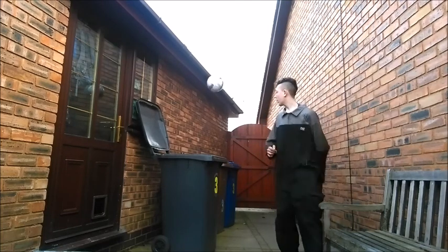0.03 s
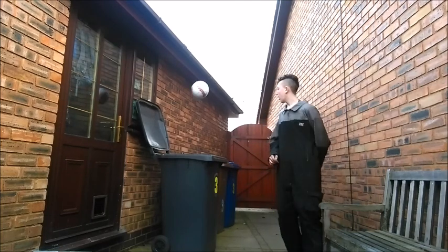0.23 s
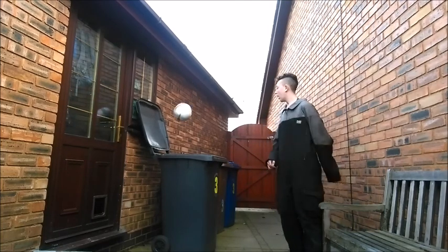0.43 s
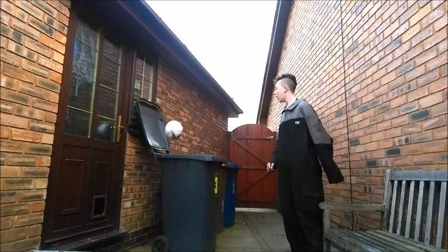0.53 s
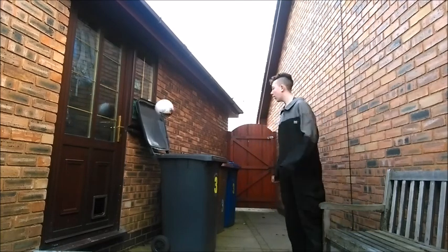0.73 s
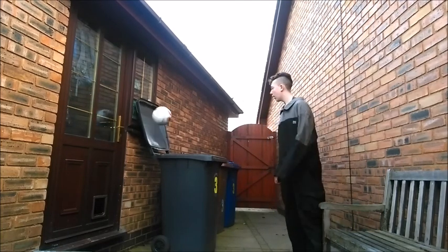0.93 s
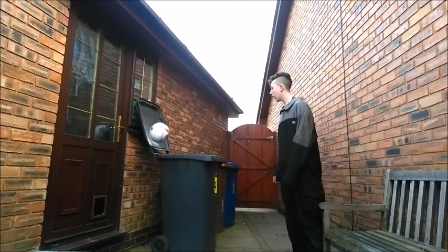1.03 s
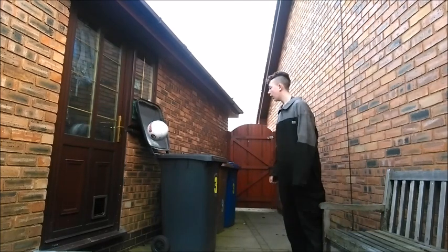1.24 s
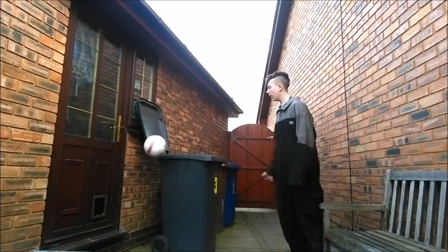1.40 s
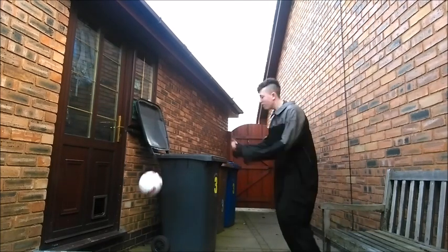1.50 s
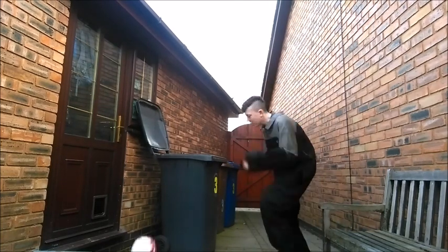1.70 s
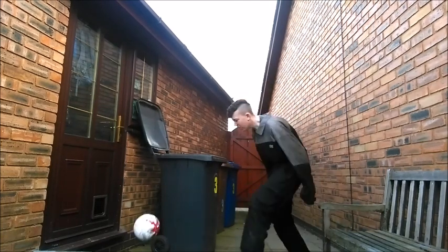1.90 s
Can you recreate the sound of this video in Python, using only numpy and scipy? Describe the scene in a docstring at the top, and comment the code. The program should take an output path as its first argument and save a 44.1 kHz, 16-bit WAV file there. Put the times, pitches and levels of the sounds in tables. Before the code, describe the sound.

A football clatters twice against a plastic wheelie bin, then drops and bounces on paving.

```python
"""Far traffic rumbles and hums around a narrow brick yard. A football clatters against a plastic
wheelie bin and its open lid: the panels ring and the hollow booms. Puffs of wind thump the
microphones, the right one hardest, and make the limiter duck, while shoes and clothes scuff.
The ball clatters on the bin a second time, drops off with a sharp slap and bounces on the
paving, where the air inside it resonates and the walls return the sound."""
import sys
import numpy as np
from scipy import signal
from scipy.fft import rfft, irfft
from scipy.io import wavfile
from scipy.ndimage import uniform_filter1d, minimum_filter1d

SR = 44100
rng = np.random.default_rng(int(sys.argv[2]) if len(sys.argv) > 2 else 0)


def bounce(signal):
    """Save signal as a 16-bit WAV file at the path given by the first command-line argument."""
    frames = np.transpose(np.atleast_2d(signal))
    limited = np.clip(frames, -1, 1)
    pcm = np.round(limited * 32767).astype(np.int16)
    wavfile.write(sys.argv[1], SR, pcm)


N = 85995
T = np.arange(N) / SR

# Spectrum of far traffic: frequency_hz, gain_db
TRAFFIC_SPECTRUM = [(20, -46), (45, -30.5), (85, -31.5), (200, -45), (350, -38), (600, -54), (1400, -58.5),
                    (3000, -61.5), (6000, -66.5), (15000, -68.5)]
# Tones of the town's hum: pitch_hz, level_db
HUM_TONES = [(156, -62.5), (323, -57.5), (414, -68)]

# Puffs of wind: start_s, length_s, level_db, corner_hz, left_minus_right_db
WIND_PUFFS = [(.008, 0.031, -39, 88, 9), (0.4, .025, -22.5, 235, -26), (0.433, 0.049, -25.5, 99, -21),
              (.485, .04, -36, 88, -13), (.571, .023, -8.5, 192, -47), (0.592, 0.0383, -16, 161, -34),
              (0.633, 0.057, -23, 107, -26), (0.675, 0.14, -35, 97, -15.5), (1.12, 0.087, -43, 85, 21),
              (1.38, 0.037, -40, 76, 13), (1.438, 0.032, -40, 77, 9)]
# Pops of the diaphragm within the puffs: start_s, level_db, pitch_hz, tick_db
DIAPHRAGM_POPS = [(0.4129, -15, 327, 4.5), (0.417, -9, 198, -4), (.4215, -27, 725, 3),
                  (0.5691, -21, 252, -5.5), (0.5767, 0, 113, 12.5), (0.5864, 0.5, 92.3, 8.5),
                  (0.5924, -12.5, 302, 5), (0.6031, -6, 126, 5), (0.6104, -22, 160, 4),
                  (0.6239, -6.5, 330, 8)]
# Spectrum of each pop's tick: frequency_hz, gain_db
TICK_SPECTRUM = [(100, -18), (400, 1.5), (800, 4.5), (1300, -6), (2200, -13.5), (3300, -24), (4500, -42),
                 (8000, -63)]

# Blows on the bin and rattles of its lid: start_s, level_db, boom_db, treble_db
BIN_BLOWS = [(0.2132, 0.5, 2.5, 5), (0.2238, 1, -5, -5), (.2445, -1.5, 4, -3), (.2835, 3.5, 6, 0),
             (0.2884, -2.5, -5, -2), (0.326, -19, -0.5, -10), (0.341, -8.5, -16, 0),
             (0.375, -12.5, -7, -12), (.8003, -5, -6.5, 6), (.823, -3, 2.5, 10.5), (.837, 1, 4, 5),
             (.852, -8, -5, 5), (0.887, -15, 2, 4.5), (1.530, -29, -12, 0)]
# Spectra of the plastic and of the hollow: frequency_hz, gain_db
CLATTER_SPECTRUM = [(100, -31.5), (300, -23), (500, -21), (660, -21), (1100, -18.5), (1750, -23.5),
                    (2200, -25.5), (2750, -22.5), (3600, -28.5), (4150, -28), (4500, -28.5), (5100, -31),
                    (11000, -36), (16000, -41)]
BOOM_SPECTRUM = [(25, -21.5), (50, -15.5), (90, -10), (140, -18), (220, -16), (350, -20.5), (600, -41),
                 (2000, -85)]
# Ring time of the bin between the walls: frequency_hz, t60_s
BIN_DECAY = [(60, 0.58), (120, 0.69), (300, 0.77), (600, 0.29), (1200, 0.3), (3000, 0.27), (6000, 0.16),
             (12000, 0.11)]
# Modes of the bin and lid: pitch_hz, level_db, t60_s
PANEL_MODES = [(103, -36.5, 0.53), (169, -49, 0.45), (209.3, -39, 0.26), (226, -57, 0.32), (334, -47, 0.66),
               (636, -41.5, 0.21), (780, -52, .28), (998, -41.5, 0.33), (1050, -58, 0.26),
               (1220, -50, 0.25), (2182, -43.5, .25), (2430, -50, 0.3), (2680, -42, 0.16),
               (2930, -50, 0.13), (4480, -41.5, 0.18)]

# Scuffs of shoes and clothes: start_s, grit_db, rise_s, t60_s, body_db
SCUFF_STROKES = [(.532, -19.5, 0.0076, 0.19, -25), (.736, -18.5, 0.00079, 0.072, -30),
                 (1.6117, 3.5, 0.0012, .055, -0.5), (1.855, -19.5, 0.0088, 0.37, -10.5)]
# Spectra of a scuff's grit and soft body: frequency_hz, gain_db
GRIT_SPECTRUM = [(300, -38), (1500, -16.5), (3500, -16.5), (6500, -9), (9000, -11), (15000, -14.5)]
BODY_SPECTRUM = [(60, -24), (170, -0.5), (350, 0), (700, -10), (2000, -16.5), (6000, -29.5)]
# Envelope of the clothing's rustle: time_s, level_db
RUSTLE_ENVELOPE = [(0, -60), (1.1, -80), (1.27, -55.5), (1.42, -59), (1.6, -53.5), (1.95, -73.5)]
# Spectrum of the rustle: frequency_hz, gain_db
RUSTLE_SPECTRUM = [(300, 3), (3000, 3.5), (7000, -4), (15000, -5.5)]

# Spectra of the ball's two impacts and of their reverberation: frequency_hz, gain_db
SLAP_SPECTRUM = [(100, -9), (500, -10), (1100, 7.5), (1800, 2), (3000, 0), (6000, 0.5), (12000, -1),
                 (16000, -11.5)]
SLAP_TAIL_SPECTRUM = [(40, -25), (95, -10), (200, -23), (450, -31), (1200, -23.5), (2500, -30),
                      (6000, -31.5), (14000, -31.5)]
BOUNCE_SPECTRUM = [(60, -15), (250, 10.5), (500, 15), (900, 10), (1400, 10.5), (2200, 5.5), (3200, -8.5),
                   (5000, -18.5), (14000, -33)]
BOUNCE_TAIL_SPECTRUM = [(60, -25), (250, -21), (750, -16), (1400, -23.5), (2100, -26), (3300, -36),
                        (6000, -45), (14000, -53)]
# Early echoes and later returns from the walls: delay_s, gain_db
SLAP_EARLY = [(.0006, -8.5), (.0029, -10), (.0066, -23)]
SLAP_RETURNS = [(.028, -10.5), (0.044, -12)]
BOUNCE_EARLY = [(.0038, -4), (.0063, -9.5), (0.0103, -13.5)]
BOUNCE_RETURNS = [(.034, -13), (.048, -27)]
# Reverberation time of the yard: frequency_hz, t60_s
YARD_DECAY = [(100, 0.37), (500, .24), (2000, 0.23), (6000, 0.2), (14000, 0.11)]
# Modes of the air in the ball: pitch_hz, level_db, t60_s
BALL_AIR_MODES = [(255, -28, 0.15), (530, -32, 0.024), (786, -34, 0.21), (1040, -51, .15),
                  (1732, -52, 0.11), (1936, -47, 0.12)]

# Shading of nearby sound at the left microphone: frequency_hz, gain_db
LEFT_SHADOW = [(60, 2), (300, -1.5), (700, -1.5), (1400, -1.5), (2800, -8.5), (5600, -9.5), (14000, -15)]


def amp(db):
    """Amplitude grows tenfold for every 20 dB."""
    return 10 ** (np.asarray(db) / 20)


def value_at(curve, hz):
    """Interpolation of a curve on a logarithmic frequency axis."""
    frequencies, values = np.array(curve).T
    return np.interp(np.log(hz), np.log(frequencies), values)


def colour(x, spectrum, size=8192):
    """Minimum-phase filtering: folding the cepstrum gives a causal response with this spectrum."""
    hz = np.maximum(np.fft.rfftfreq(size, 1 / SR), 1)
    cepstrum = irfft(np.log(amp(value_at(spectrum, hz))))
    cepstrum[1:size // 2] *= 2
    cepstrum[size // 2 + 1:] = 0
    response = irfft(np.exp(rfft(cepstrum)))[None, :size // 2]
    return signal.oaconvolve(x, response, axes=-1)[:, :N]


def butterworth(x, hz, kind="low", order=2):
    """A maximally flat filter falls 6 dB per octave per order beyond its corner."""
    return signal.sosfilt(signal.butter(order, hz, kind, fs=SR, output="sos"), x + 1e-18)


def diffuse_noise(corner_hz=770):
    """A diffuse field is alike at two microphones only at long wavelengths."""
    right, independent = rng.standard_normal((2, N))
    treble = butterworth(independent, corner_hz, "high", order=1)
    bass = irfft(rfft(right) / np.hypot(1, np.fft.rfftfreq(N, 1 / SR) / corner_hz), N)
    return np.array([bass + treble, right])


def envelope(start, rise, t60):
    """Exponential decay: after a quick rise, the amplitude falls 60 dB in t60 seconds."""
    out, first = np.zeros(N), int(start * SR)
    age = T[:min(N - first, int(2 * t60 * SR))]
    out[first:first + len(age)] = (1 - np.exp(-age / rise)) * np.exp(-np.log(1000) * age / t60)
    return out


def impulses(events):
    """An ideal impulse excites all frequencies alike; events are start_s, level_db."""
    out = np.zeros((2, N))
    for start, db in events:
        out[:, int(start * SR)] += amp(db)
    return out


def distant_town():
    """Far traffic merges into low noise; random phase modulation makes the hum waver."""
    out = colour(diffuse_noise(), TRAFFIC_SPECTRUM)
    for hz, db in HUM_TONES:
        waver = butterworth(rng.standard_normal(N), 9)
        out += amp(db) * np.sin(2 * np.pi * hz * T + 1.26 * waver / waver.std())
    return out


def wind_eddies():
    """Turbulent pressure rumbles on the microphones, mostly the right one."""
    out = np.zeros((2, N))
    for start, length, db, corner_hz, pan_db in WIND_PUFFS:
        progress = np.clip((T - start) / length, 0, 1)
        swell = np.sqrt(np.maximum(np.sin(np.pi * progress), 0))
        eddy = butterworth(rng.standard_normal(N), corner_hz)
        eddy = butterworth(eddy, 39.5, "high")
        eddy = butterworth(swell * eddy, 3.9 * corner_hz)
        eddy /= np.sqrt(np.sum(eddy ** 2) / (length * SR))  # unit RMS over the puff
        out += amp([[db + min(pan_db, 0)], [db - max(pan_db, 0)]]) * eddy
    return out


def diaphragm_pops(decay_cycles=0.47, left_db=-36):
    """A wind-struck diaphragm is a heavily damped oscillator: it ticks, flutters and pops."""
    ticks = [(start, tick_db) for start, _, _, tick_db in DIAPHRAGM_POPS]
    flutter = sum(amp(db - 19) * envelope(start, rise=0.00028, t60=0.017) for start, db in ticks)
    rasp = flutter * rng.standard_normal(N)
    pops = colour(amp(-4.5) * impulses(ticks) + rasp, TICK_SPECTRUM)[0]
    for start, db, hz, _ in DIAPHRAGM_POPS:
        cycles = np.maximum(T - start, 0) * hz
        swing = np.sin(2 * np.pi * cycles) * np.exp(-cycles / decay_cycles)
        pops += amp(db) * butterworth(swing, 2200, order=4)
    return amp([[left_db], [0]]) * pops


def dense_ringing(hits, spectrum, decay, rise):
    """Overlapping modes act as noise: hits add in power and each octave decays at its own rate."""
    noise_bins = rfft(colour(diffuse_noise(), spectrum))
    octave = np.log2(np.clip(np.fft.rfftfreq(N, 1 / SR), 62.5, 16000) / 62.5)
    out = np.zeros((2, N))
    for k in range(9):
        hz = 62.5 * 2 ** k
        t60, treble_share = value_at(decay, hz), hz / (hz + 3000)
        power = sum((amp(db + treble_db * treble_share) * envelope(start, rise, t60)) ** 2
                    for start, db, treble_db in hits)
        band = irfft(noise_bins * np.maximum(1 - abs(octave - k), 0), N)
        out += np.sqrt(power) * band
    return out


def modal_ringing(modes, start, detune):
    """Free vibration is a sum of damped sinusoids, here slightly detuned at every blow."""
    out, first = np.zeros(N), int(start * SR)
    age = T[:min(N - first, N // 3)]
    for (hz, db, t60), deviation in zip(modes, rng.standard_normal(len(modes))):
        tone = np.sin(2 * np.pi * hz * (1 + detune * deviation) * age)
        out[first:first + len(age)] += amp(db) * tone * np.exp(-np.log(1000) * age / t60)
    return out


def wheelie_bin(rattle_depth=0.18):
    """Impact excitation: each blow cracks, rattles the lid, rings the panels and booms in the hollow."""
    jitter = butterworth(rng.standard_normal(N), 610)
    rattle = np.exp(rattle_depth * jitter / jitter.std() - rattle_depth ** 2)
    panel_hits = [(start, db, treble_db) for start, db, _, treble_db in BIN_BLOWS]
    cavity_hits = [(start, boom_db, 0) for start, _, boom_db, _ in BIN_BLOWS]
    clatter = dense_ringing(panel_hits, CLATTER_SPECTRUM, BIN_DECAY, rise=0.003)
    bursts = sum(amp(db + treble_db - 6) * envelope(start, rise=0.0004, t60=0.032)
                 for start, db, treble_db in panel_hits)
    crack = bursts * colour(diffuse_noise(), CLATTER_SPECTRUM)
    boom = dense_ringing(cavity_hits, BOOM_SPECTRUM, BIN_DECAY, rise=0.0062)
    tones = sum(amp(db) * modal_ringing(PANEL_MODES, start, detune=0.0028)
                for start, db, _ in panel_hits)
    return rattle * (clatter + crack) + boom + tones


def shoes_and_clothes():
    """Friction makes noise: gritty scuffs with a soft body, over a faint rustle of cloth."""
    grit = colour(diffuse_noise(), GRIT_SPECTRUM)
    body = colour(diffuse_noise(), BODY_SPECTRUM)
    scuffs = sum(envelope(start, rise, t60) * (amp(grit_db - 21) * grit + amp(body_db - 19) * body)
                 for start, grit_db, rise, t60, body_db in SCUFF_STROKES)
    rustle_db = np.interp(T, *np.array(RUSTLE_ENVELOPE).T)
    return scuffs + amp(rustle_db) * colour(diffuse_noise(), RUSTLE_SPECTRUM)


def yard_impact(start, spectrum, early, tail_spectrum, returns, scatter_db, scatter_t60):
    """Reflection follows a pulse with early echoes, scatter from nearby things and reverberation."""
    arrivals = [(start, 0)] + [(start + delay, db) for delay, db in early]
    pulses = colour(impulses(arrivals), spectrum)
    scatter = colour(diffuse_noise(), spectrum) * envelope(start, rise=0.0011, t60=scatter_t60)
    tail_hits = [(start, 0, 0)] + [(start + delay, db, 0) for delay, db in returns]
    tail = dense_ringing(tail_hits, tail_spectrum, YARD_DECAY, rise=0.0013)
    return pulses + amp(scatter_db) * scatter + tail


def ball_slap(start_s):
    """A brief contact radiates a broad spectrum: the ball drops away with a bright slap."""
    return amp(3) * yard_impact(start_s, SLAP_SPECTRUM, SLAP_EARLY, SLAP_TAIL_SPECTRUM,
                                SLAP_RETURNS, scatter_db=-17, scatter_t60=0.038)


def ball_bounce(start_s):
    """Cavity resonance: striking the paving sets the air in the ball ringing hollowly."""
    thud = yard_impact(start_s, BOUNCE_SPECTRUM, BOUNCE_EARLY, BOUNCE_TAIL_SPECTRUM,
                       BOUNCE_RETURNS, scatter_db=-25, scatter_t60=0.067)
    return amp(0.5) * thud + modal_ringing(BALL_AIR_MODES, start_s, detune=0.0014)


def scene(left_delay_s=0.00027):
    """The sources superpose; nearby sound reaches the left microphone later and duller."""
    near = wheelie_bin() + shoes_and_clothes() + ball_slap(1.4892) + ball_bounce(1.6433)
    shaded = colour(near[:1], LEFT_SHADOW)[0]
    left = np.interp(T - left_delay_s, T, shaded)
    return np.array([left, near[1]]) + diaphragm_pops() + wind_eddies() + distant_town()


def record(dry, limit_db=-7, release_s=0.09, low_cut_hz=41, top_hz=16000):
    """Peak limiting between two band-edge filters: both channels duck together and recover slowly."""
    dry = butterworth(dry, low_cut_hz, "high")
    peak = -minimum_filter1d(-abs(dry).max(axis=0), size=128)
    excess = np.log(np.maximum(peak / amp(limit_db), 1))
    # Each excess is held as a gain reduction that decays exponentially.
    reduction = np.maximum.accumulate(excess * np.exp(T / release_s)) * np.exp(-T / release_s)
    gain = np.exp(-uniform_filter1d(reduction, size=128))
    return signal.sosfilt(signal.ellip(8, .2, 70, top_hz, fs=SR, output="sos"), dry * gain)


dry = scene()
out = record(dry)
bounce(out)
```